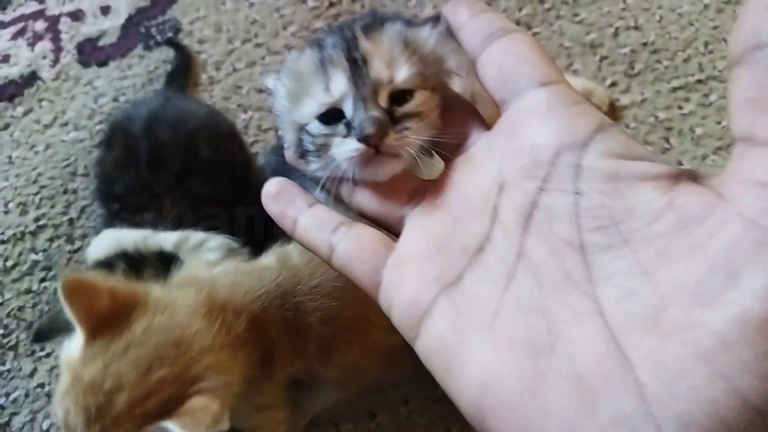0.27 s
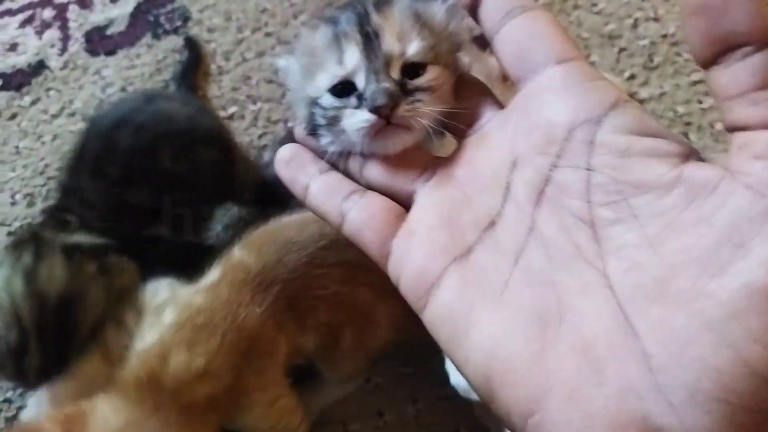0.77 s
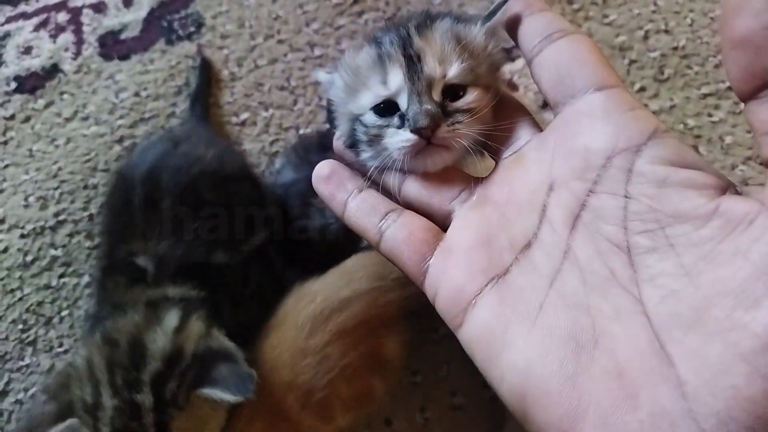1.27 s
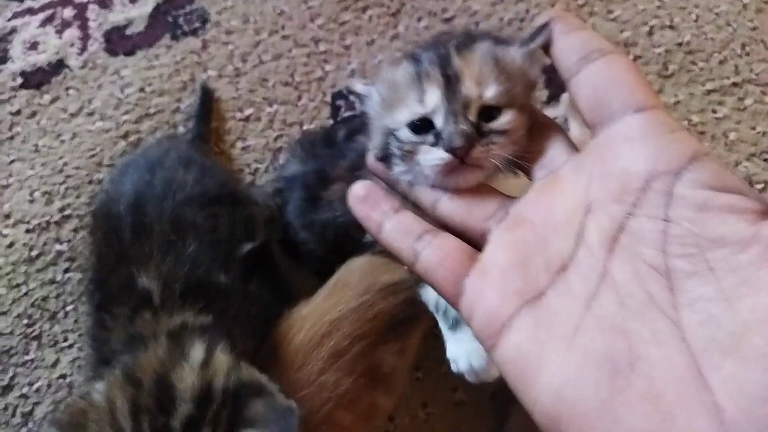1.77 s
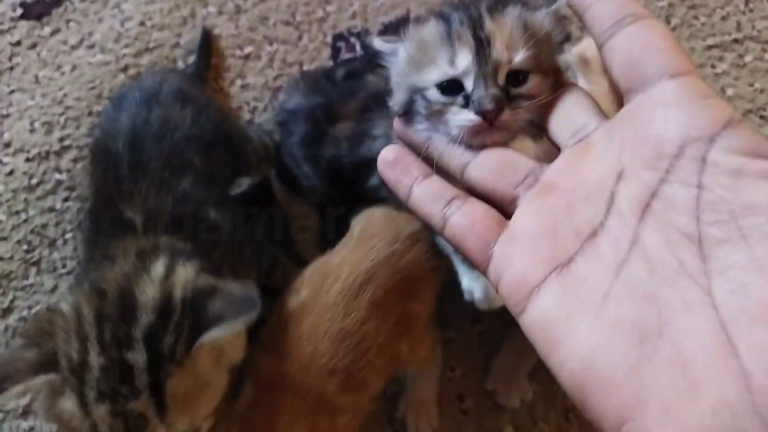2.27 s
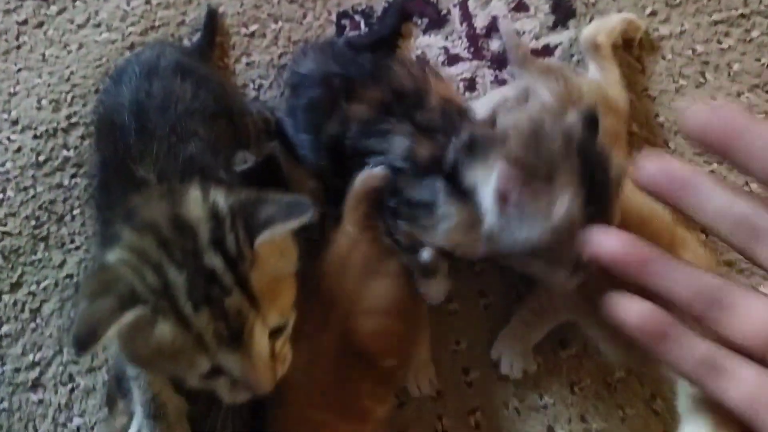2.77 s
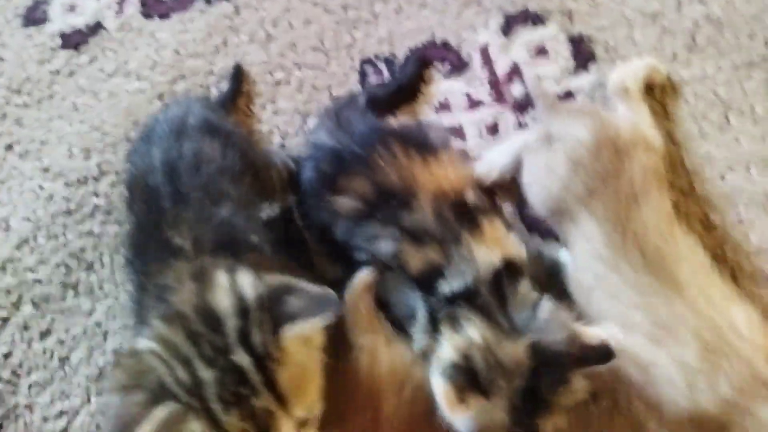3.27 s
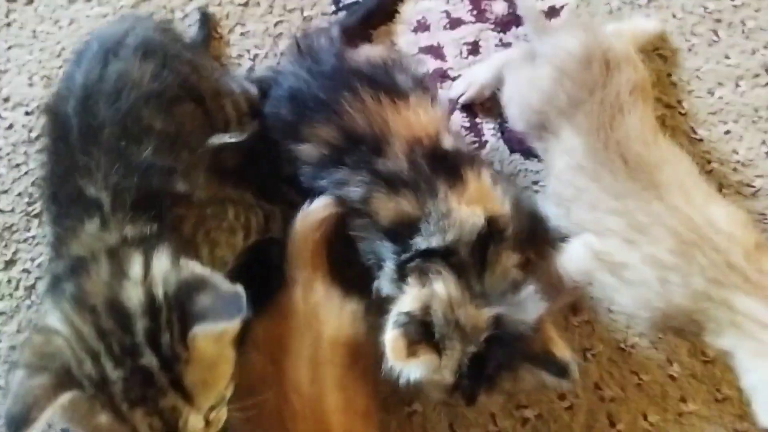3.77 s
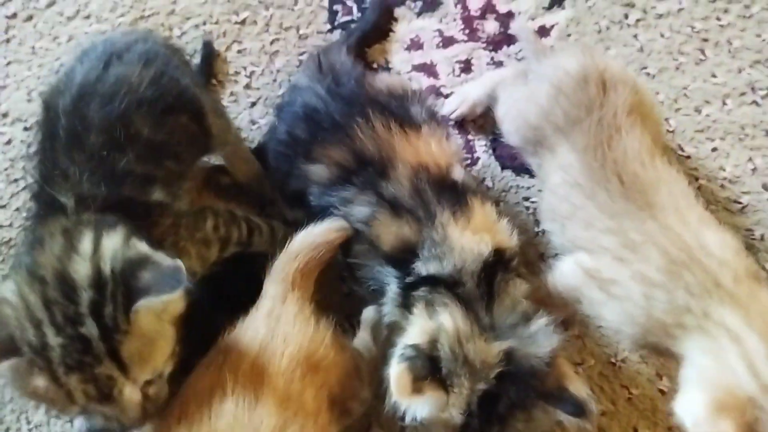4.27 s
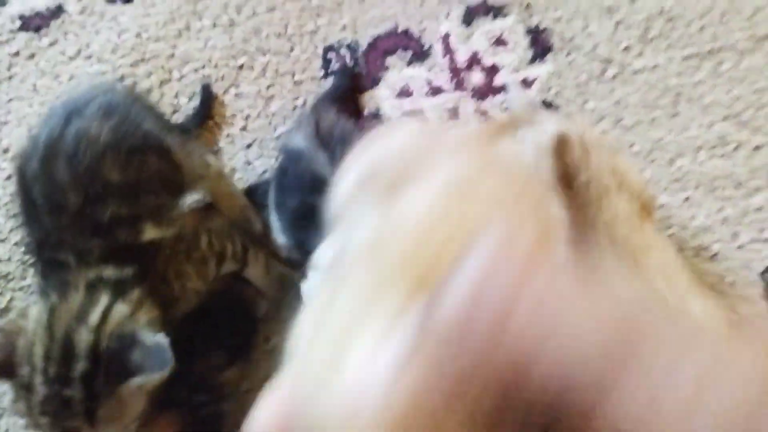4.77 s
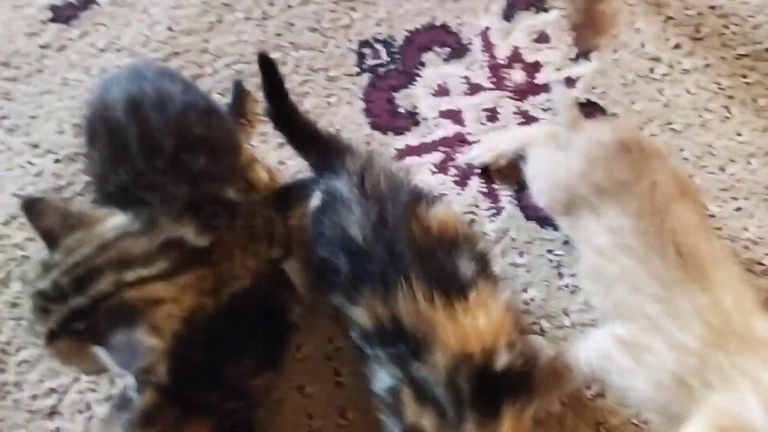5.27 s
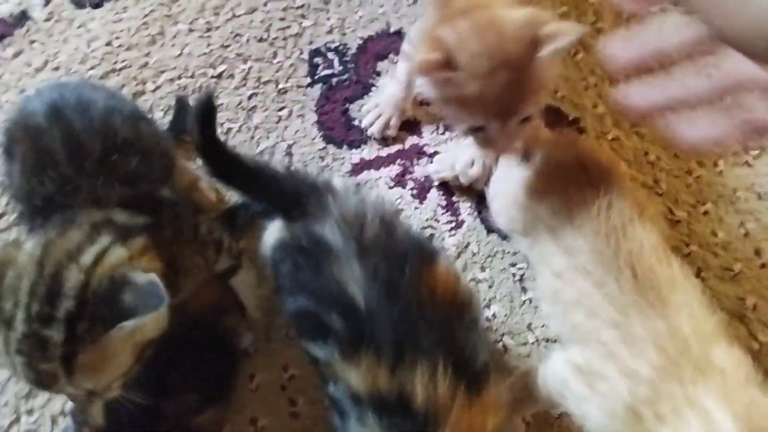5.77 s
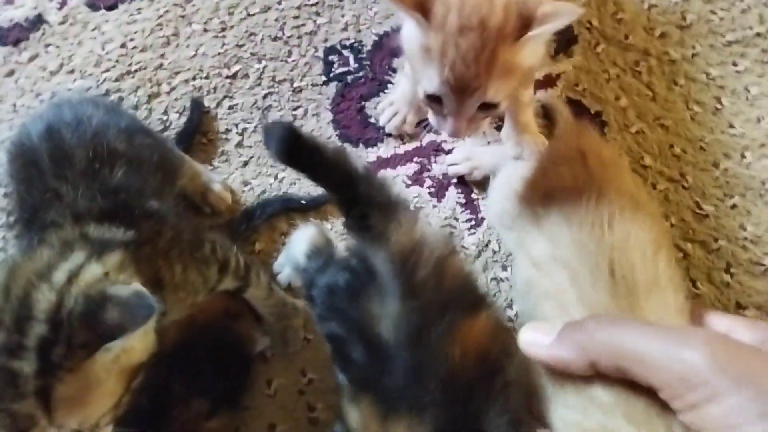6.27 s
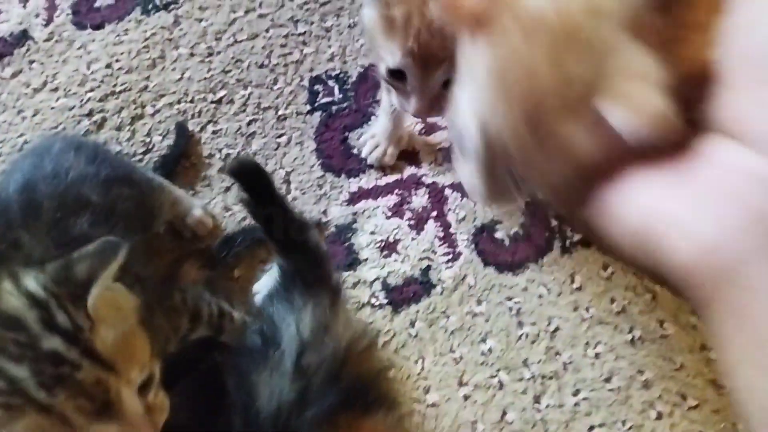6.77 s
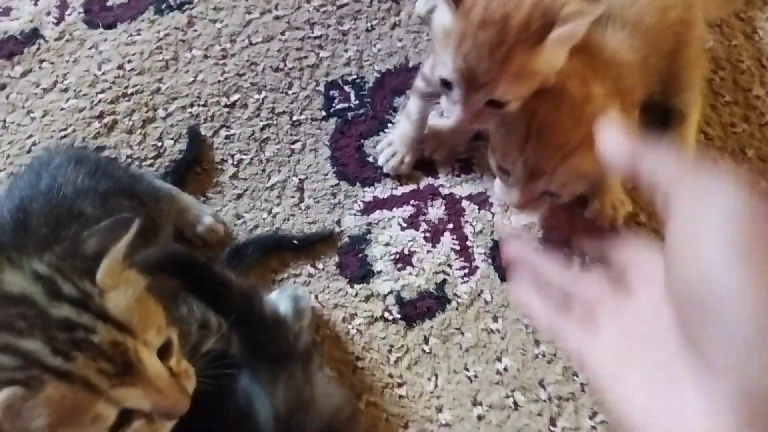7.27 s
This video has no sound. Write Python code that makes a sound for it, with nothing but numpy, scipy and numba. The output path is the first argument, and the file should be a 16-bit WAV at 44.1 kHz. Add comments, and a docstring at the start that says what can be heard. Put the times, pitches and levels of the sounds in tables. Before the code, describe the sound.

A quiet carpeted room with steady air, faint motor hum and swelling low rumble. Tiny squeaks from another kitten come first, then one close, half-second trilled mew with breath around it. Afterwards only soft fur rustles, paw thumps and sharp little knocks remain, the strongest late on. Distant birds twitter and a clock ticks faintly once a second. Close stereo microphone, short room tail.

```python
"""A kitten close by gives one trilled mew: a near-sine voice with overtones coloured by mouth and throat.
Noise of breath surrounds it, and another kitten squeaks faintly in short gliding whistles.
Paws and claws knock as damped rings and bits of treble noise; fur rustles on carpet as grainy noise.
Behind them a wall clock ticks in filtered noise, birds twitter far off in sliding tones,
and the quiet room adds steady air noise, a fan motor's hum in sine lines and a swelling low rumble."""
import sys
import numpy as np
from scipy import signal
from scipy.fft import rfft, irfft, next_fast_len
from scipy.io import wavfile
from scipy.ndimage import uniform_filter1d
from numba import njit

SR = 44100
rng = np.random.default_rng(int(sys.argv[2]) if len(sys.argv) > 2 else 0)


def natural_amplitude(level_db):
    """Convert a level in decibels to a linear amplitude factor, elementwise."""
    exponent = np.asarray(level_db, float) / 20
    return 10 ** exponent


def log_audio(samples):
    """Write samples as a 16-bit WAV file to the path given in sys.argv[1]."""
    # one column per channel
    frames = np.atleast_2d(samples).T
    # limit to full scale, then quantise
    limited = np.clip(frames, -1, 1)
    pcm = np.round(limited * 32767).astype(np.int16)
    wavfile.write(sys.argv[1], SR, pcm)


N = 331894
T = np.arange(N) / SR  # time in seconds
MIRROR = np.array([[1], [-1]])  # adds to the left, takes from the right


def on_log(table, hz):
    """Read a (Hz, value) table on a log-frequency axis."""
    table_hz, values = np.transpose(table)
    return np.interp(np.log(np.maximum(hz, 1)), np.log(np.maximum(table_hz, 1)), values)


def unit(x):
    """Scale to rms 1."""
    return x / np.sqrt(np.mean(x ** 2))


def shape(x, gain):
    """Filter by multiplying the spectrum by gain(Hz)."""
    size = next_fast_len(N)
    hz = np.arange(size // 2 + 1) * SR / size
    return irfft(rfft(x, size) * gain(hz), size)[..., :N]


def bump(hz, centre, width):
    """Gain of one resonance."""
    return 1 / np.sqrt(1 + (2 * (hz - centre) / width) ** 2)


def resonances(table, hz, power):
    """Summed gain of the resonances in a (Hz, width Hz, dB) table; a higher power makes steeper sides."""
    return sum(natural_amplitude(db) * bump(hz, centre, width) ** power for centre, width, db in table)


def pulse(middle, half_width, power=2):
    """Smooth rise and fall around a moment in seconds."""
    return np.exp(-((T - middle) / half_width) ** power)


def walk(rate):
    """Random wander of rms 1: levels held for 1 / rate seconds, then smoothed twice."""
    k = max(int(SR / rate), 1)
    steps = np.repeat(rng.standard_normal(N // k + 1), k)
    return unit(uniform_filter1d(uniform_filter1d(steps, k), k)[:N])


def pan(x, db):
    """Two channels, left louder by db."""
    return x * natural_amplitude(MIRROR * db / 2)


@njit
def svf(x, hz, width):
    """State-variable band-pass whose centre may move every sample."""
    y, b, l = np.empty(len(x)), 0., 0.
    for i in range(len(x)):
        g, k = np.tan(np.pi * hz[i] / SR), width / hz[i]
        v = (b + g * (x[i] - l)) / (1 + g * (g + k))
        b, l, y[i] = 2 * v - b, l + 2 * g * v, k * v
    return y


def band(x, hz, width):
    """Band-pass at a fixed or moving centre."""
    return svf(x, np.clip(hz + np.zeros(len(x)), 20, .45 * SR), float(width))


def double_band(x, hz, width):
    """The same band-pass twice, for steeper sides."""
    return band(band(x, hz, width), hz, width)


def echo(x, t60, wet_db, wait_s=0.0075):
    """Room tail: two decaying noises that start when the first wall answers."""
    t = np.arange(8000) / SR
    tail = rng.standard_normal((2, len(t))) * np.exp(-np.log(1000) * t / t60) * (t > wait_s)
    tail /= np.sqrt(np.sum(tail ** 2, axis=1, keepdims=True))
    return natural_amplitude(wet_db) * signal.fftconvolve(np.atleast_2d(x), tail, axes=1)[:, :N]


def overtones(phase, gains, order):
    """Partials from number `order` up, each wavering a little, together of rms near 1."""
    tones = sum(g * natural_amplitude(2 * walk(60)) * np.cos((k + order) * (phase - .8)) for k, g in enumerate(gains))
    return tones / np.sqrt(sum(g ** 2 for g in gains) / 2)


def held(start, full, fade, end, db, lost_db):
    """Level in dB that rises, holds and falls; -120 dB outside."""
    levels_db = [db - lost_db, db, db, db - lost_db]
    return np.interp(T, [start, full, fade, end], levels_db, -120, -120)


# Colour of the room air. Each row: frequency in Hz, relative level in dB.
ROOM_COLOUR = [(15, -46.5), (25, -40), (82, -1.5), (249, 0.5), (335, -7.5), (439, -8), (489, -10),
               (560, -12.5), (796, -12), (1130, -17.5), (2350, -20), (4030, -22.5), (7310, -33.5),
               (12200, -30), (16000, -33)]
# How alike the air is left and right. Each row: frequency in Hz, likeness (below 0 counts as 0).
ROOM_ALIKE = [(60, -0.23), (130, 0.86), (290, 0.59), (640, 0.2), (1410, -0.04), (3100, -0.96), (6820, -1.1),
              (15000, -1.1)]
# Hum lines of the fan motor. Each row: frequency in Hz, level in dB.
MOTOR_LINES = [(80, -78), (129.2, -77), (148, -76), (197, -78), (246, -74), (393.0, -74.5), (441.4, -76),
               (786.0, -83.5)]
# Swells of the low rumble. Each row: peak time in seconds, level in dB.
RUMBLE_SWELLS = [(.95, -63.5), (2.4, -71), (3.3, -64), (4.45, -65), (5.55, -65), (6.05, -70), (6.9, -65),
                 (7.4, -59.5)]


def room():
    """Steady air and far traffic as shaped noise, motor lines as wavering sines, a rumble as low noise."""
    mid, side = rng.standard_normal((2, N))
    alike = lambda f: np.clip(on_log(ROOM_ALIKE, f), 0, .99)
    mid = shape(mid, lambda f: natural_amplitude(on_log(ROOM_COLOUR, f)) * np.sqrt(1 + alike(f)))
    side = shape(side, lambda f: natural_amplitude(on_log(ROOM_COLOUR, f)) * np.sqrt(1 - alike(f)))
    air = natural_amplitude(-62.5) * (mid + side * MIRROR) / np.std(mid)
    # the treble of the air rises and falls slowly
    air += shape(air, lambda f: f > 5000) * (natural_amplitude(0.56 * walk(4.3)) - 1)
    hum = 0
    for hz, db in MOTOR_LINES:
        line = np.sqrt(2) * np.sin(2 * np.pi * hz * T + 1.1 * walk(4.6))
        hum = hum + natural_amplitude(db + 2 * walk(6)) * line
    rise_db_per_s, fall_db_per_s = 50, 35
    swell = sum(natural_amplitude(db - np.maximum(rise_db_per_s * (s - T), fall_db_per_s * (T - s)))
                for s, db in RUMBLE_SWELLS)
    rumble = unit(double_band(rng.standard_normal(N), 84, 70)) * swell
    return pan(air, 0.95) + hum + rumble


# Far bird phrases. Each row: middle in seconds, length in seconds, level in dB, pitch in Hz at the middle.
BIRD_PHRASES = [(.1, .14, -72, 4200), (.28, .2, -71, 3700), (.54, .22, -69, 3600), (.95, .4, -70, 3300),
                (1.3, .2, -65.5, 3900), (1.58, .16, -72, 3900), (1.74, .15, -73, 3380),
                (2.8, .22, -66.5, 4000), (3.03, .2, -71, 3300), (3.34, .14, -66, 3700),
                (3.53, .25, -66, 3550), (3.8, .15, -74, 3900), (4.1, .12, -71, 3500),
                (4.48, .26, -66.5, 3550), (4.7, .14, -74, 3300), (4.95, .2, -67, 4000),
                (5.2, .3, -69, 4000), (5.48, .2, -69, 4000), (5.77, .16, -67, 4200), (6.3, .45, -67, 3750),
                (6.68, .2, -71, 3700), (7.04, .25, -65.5, 3800), (7.3, .3, -67, 4000)]
# Single far peeps. Each row: middle in seconds, length in seconds, pitch in Hz, level in dB.
BIRD_PEEPS = [(.17, .06, 1850, -76), (.245, .05, 1950, -75), (.835, 0.058, 2700, -75),
              (1.006, .09, 2830, -74), (1.049, 0.013, 4240, -68), (1.45, 0.11, 2294, -78),
              (1.632, 0.032, 1216, -70), (4.797, 0.095, 2760, -74), (4.96, .06, 2738, -75),
              (6.745, 0.02, 1830, -69), (6.745, 0.0083, 4300, -66.5)]


def birds():
    """Falling twitters round a sliding centre and lone peeps, blurred by distance and walls."""
    s, length, db, hz = np.transpose(BIRD_PHRASES)[:, :, None]
    phrases = natural_amplitude(db) * pulse(s, length / 2)
    loud, now = phrases.sum(axis=0), np.argmax(phrases, axis=0)  # now: the loudest phrase at each moment
    slide_s = np.clip(T - s[now, 0], -length[now, 0], length[now, 0])
    fall_hz_per_s = 2200
    centre = uniform_filter1d(hz[now, 0] - fall_hz_per_s * slide_s, size=400)
    chirps = 0
    for offset in (-.19, -.12, -.05, 0.034, 0.12, 0.18):  # six voices, pitched around the centre
        cycle = np.cumsum(11 * (1 + .4 * walk(3))) / SR % 1  # about 11 chirps a second
        pitch = centre * (1 + offset + .03 * walk(20) + .16 * (.5 - cycle))
        tone = np.sin(2 * np.pi * np.cumsum(pitch) / SR)
        chirps = chirps + tone * np.sin(np.pi * cycle) ** 2 * natural_amplitude(3.5 * walk(8))
    blur = unit(np.array([double_band(rng.standard_normal(N), centre, 1500) for _ in range(2)]))
    peeps = 0
    for s, length, hz, db in BIRD_PEEPS:
        tone = np.sin(2 * np.pi * hz * T + 2.2 * walk(40))
        peeps = peeps + natural_amplitude(db) * tone * pulse(s, length / 2, 4)
    return echo(unit(chirps) * loud, .14, -2.5) + natural_amplitude(-3) * blur * loud + peeps + echo(peeps, 0.05, 1)


# Resonances of the clock case. Each row: frequency in Hz, width in Hz, relative level in dB.
CLOCK_CASE = [(527, 72, 11), (1300, 1500, -2.5), (2170, 810, -5.5), (5900, 1200, -8), (12000, 5000, -13)]
# Ticks, one row a second. Each row: rattle level in dB, knock level in dB.
CLOCK_TICKS = [(-74, -70), (-76, -60), (-69, -51), (-74.5, -74), (-74.5, -62), (-73, -56), (-78, -76),
               (-73.5, -58)]


def clock():
    """Once a second the gears step: a knock, then a rattle of about 70 ms in the case, far off."""
    first_s = .06
    since = (T - first_s) % 1
    rattle_db, knock_db = np.array(CLOCK_TICKS)[np.maximum(T - first_s, 0).astype(int)].T
    steps = np.minimum(since / 0.0032, 1) * np.exp(-since / 0.037)
    steps += .5 * np.exp(-((since - .05) / .035) ** 2)
    rattle = rng.standard_normal((2, N)) * natural_amplitude(2.8 * walk(120)) * steps
    case = shape(rattle, lambda f: resonances(CLOCK_CASE, f, 1))
    knock = np.sin(2 * np.pi * 560 * since) * since / 0.008 * np.exp(1 - since / 0.0059)
    return natural_amplitude(rattle_db) * unit(case) + natural_amplitude(knock_db) * knock


# Rustles of fur on carpet.
# Each row: middle in seconds, length in seconds, level in dB, tilt in dB per octave (900 to 9000 Hz).
FUR_RUSTLES = [(3.2, 1.1, -79, 6), (6.92, .35, -76, 6), (3.29, .05, -69, 5), (3.385, .04, -66.5, 10.5),
               (3.756, 0.087, -68.5, -2), (4.517, 0.045, -57.5, -12), (5.986, 0.052, -65.5, -2.5),
               (6.257, 0.1, -68.5, -3.5), (6.515, 0.12, -61.5, -3), (6.654, .022, -60, -6)]


def rustles():
    """Brief swells of grainy noise from fur on carpet; a very dull one is more alike left and right."""
    out = 0
    for s, length, db, tilt_db in FUR_RUSTLES:
        swell = pulse(s, length / 2, 4)
        mid, side = rng.standard_normal((2, N)) * natural_amplitude(3 * walk(330))
        grain = mid + np.clip(2 + tilt_db / 8, .2, 1) * side * MIRROR
        tilt = lambda f: natural_amplitude(tilt_db * np.log2(np.clip(f, 900, 9000) / 2000)) * (f > 200)
        grain = shape(grain, tilt) * swell
        out = out + grain * natural_amplitude(db) * np.sqrt(np.mean(swell ** 2) / np.mean(grain ** 2))
    return out


# Knocks of claws and hands. Each row: start in seconds, ring level in dB, ring pitch in Hz,
# cycles over which the ring decays (at least 0.3), treble crack level in dB, left minus right in dB.
KNOCKS = [(.8422, -43.5, 630, .67, -71.5, -11.5), (1.7192, -54, 1260, 1.5, -64, -5),
          (2.8262, -44, 1700, 4.5, -64, -8), (3.6032, -48, 4100, .9, -51, 4.5),
          (4.8872, -46.5, 1400, 1.3, -52, 6), (4.9432, -39.5, 2680, 1.1, -62, -.5),
          (6.4775, -47, 2000, .8, -60, 4.5), (6.483, -42, 3300, 1.3, -58, 12),
          (6.4945, -46, 2200, .8, -57, 9), (6.514, -45, 2150, .9, -57, 5), (6.5338, -32, 2880, .94, -53, 8),
          (6.5405, -44, 1500, .8, -51, 4.5), (6.6314, -27, 800, .7, -43, 9.5),
          (6.6324, -37, 330, 1, -52, 9.5)]
# Dry snaps, crack only. Each row: start in seconds, level in dB, left minus right in dB.
DRY_SNAPS = [(1.7402, -39, -5), (1.9532, -51.5, -4), (6.4685, -56, 5), (6.523, -58, 6), (6.585, -55, 10)]
# Soft thumps of paws. Each row: start in seconds, level in dB, pitch in Hz.
PAW_THUMPS = [(0.31, -69, 201), (1.887, -58, 102), (3.189, -55, 130), (3.525, -69, 274),
              (3.992, -54.5, 269), (6.79, -58.5, 129), (7.056, -62.5, 121), (7.171, -55, 103)]


def clicks():
    """Each knock is a short damped ring and a crack of treble, a snap the crack alone; thumps ring low and soft."""
    out, t = np.zeros((2, N + 4096)), np.arange(4096) / SR
    crack = lambda: double_band(rng.standard_normal(len(t)), 10000, 14000) * np.exp(-t / 0.0011)

    def add(s, sound):
        start = int(s * SR)
        out[:, start:start + len(t)] += sound

    for s, ring_db, hz, cycles, crack_db, pan_db in KNOCKS:
        ring = -np.sin(2 * np.pi * hz * t) * np.exp(-t * hz / max(cycles, .3))
        ring += .5 * np.sin(2 * np.pi * min(3.0 * hz, 2800) * t) * np.exp(-t / 0.00053)
        add(s, pan(natural_amplitude(ring_db) * ring + natural_amplitude(crack_db) * crack(), pan_db))
    for s, db, pan_db in DRY_SNAPS:
        add(s, pan(natural_amplitude(db) * crack(), pan_db))
    tail = echo(out[0, :N], 0.11, -11.5, wait_s=0.012)  # the thumps get no tail
    for s, db, hz in PAW_THUMPS:
        add(s, natural_amplitude(db) * np.sin(2 * np.pi * hz * t) * t / 0.0068 * np.exp(1 - t / 0.01))
    return out[:, :N] + tail


# Faint squeak notes. Each row: start in seconds, length in seconds, start pitch in Hz, end pitch in Hz,
# level in dB, second partial in dB relative to the first.
SQUEAK_NOTES = [(.084, .036, 1400, 900, -55, -24), (.116, .02, 1050, 1250, -57, -25),
                (.901, .018, 1480, 1380, -56, -9), (.914, .05, 1280, 1030, -58, -5.5)]


def squeaks():
    """Another kitten's short gliding whistles with a second partial: quick start, fading to the end."""
    out = 0
    for s, length, hz, end_hz, db, second_db in SQUEAK_NOTES:
        done = np.clip((T - s) / length, 0, 1)
        glide_hz = (hz + (end_hz - hz) * done) * (1 + .025 * walk(300))
        phase = 2 * np.pi * np.cumsum(glide_hz) / SR
        size = natural_amplitude(db + 2 * walk(250)) * np.clip(np.minimum(done / .3, (1 - done) / .5), 0, 1)
        out = out + np.sqrt(2) * size * (np.sin(phase) + natural_amplitude(second_db) * np.sin(2 * phase))
    return pan(out, 0.5) + echo(out, .17, -8.5)


# Resonances of the nose. Each row: frequency in Hz, width in Hz, relative level in dB.
NOSE = [(9150, 230, 6.5), (10500, 500, -5), (11800, 380, 7.5), (13100, 500, -1), (14700, 1100, 2.5)]
# Resonances of the mouth for breath. Each row: frequency in Hz, width in Hz, relative level in dB.
MOUTH = [(1780, 780, 3.5), (2300, 450, 0.5), (3480, 480, 0.5), (5200, 1800, -27)]
# Air around the mew, through nose and mouth. Each holds: start, full, fade and end in seconds,
# level in dB when full, dB lost at start and end.
NOSE_AIR = (1.86, 2.1, 2.42, 2.72, -61.5, 17)
MOUTH_AIR = (1.88, 2.16, 2.36, 2.72, -50.5, 27)
# Last lone closures of the vocal folds as the voice dies. Each row: start in seconds, level in dB.
CREAKS = [(2.5015, -37), (2.513, -31.5)]


def breath():
    """Thin hiss through the nose and a darker one through the mouth, puffed once a voice cycle, strongest in the trill."""
    # the last factor weakens everything below 8600 Hz
    nose_colour = lambda f: resonances(NOSE, f, 1.5) * bump(np.minimum(f, 8600), 12000, 900) ** 2
    nose = shape(rng.standard_normal((2, N)), nose_colour)
    when, hz, effort_db = np.transpose(MEW)[:3]
    voiced = np.clip((np.interp(T, when, effort_db, -90, -90) + 44) / 15, 0, .9)
    puffs = 1 + voiced * np.cos(2 * np.pi * np.cumsum(np.interp(T, when, hz)) / SR)
    trill_db = sum(14 * rough * pulse(s, spread) * (1 + .5 * walk(180)) for s, spread, rough in TRILL)
    sigh_db = 8 * pulse(2.535, .05)  # a last puff as the voice stops
    mouth = unit(shape(rng.standard_normal(N) * puffs, lambda f: resonances(MOUTH, f, 2)))
    mouth *= natural_amplitude(held(*MOUTH_AIR) + sigh_db + trill_db + 2.5 * walk(60))
    for s, db in CREAKS:
        since = np.maximum(T - s, 0)
        ring = sum(natural_amplitude(gain_db) * np.sin(2 * np.pi * centre * since) * np.exp(-np.pi * width * since)
                   for centre, width, gain_db in MOUTH[:3])
        mouth += natural_amplitude(db) * ring * np.minimum(since / .0008, 3)
    return unit(nose) * natural_amplitude(held(*NOSE_AIR) + .8 * walk(40)) + pan(mouth, -5.5) + echo(mouth, 0.13, -6)


# Course of the mew. Each row: time in seconds, pitch in Hz, effort in dB,
# second partial in dB above the effort, overtones in dB above the effort.
MEW = [(2.05, 665, -47.5, -17, -9), (2.062, 628, -34, -18, -10), (2.098, 588, -30, -28, -7),
       (2.112, 535, -26, -26, -9), (2.134, 450, -19.5, -22, -22), (2.15, 466, -21, -23, -24),
       (2.17, 526, -21, -20, -10), (2.186, 555, -22.5, -22, -10), (2.204, 548, -23, -22, -15),
       (2.226, 534, -20.5, -21, -11), (2.27, 521, -21, -24, -13), (2.29, 486, -19, -17, -22),
       (2.305, 476, -18, -21, -26), (2.325, 510, -20, -27, -16), (2.345, 512, -21.5, -33, -17),
       (2.374, 496, -19.5, -26, -19), (2.412, 478, -19, -20, -19.5), (2.44, 450, -19, -22, -26),
       (2.46, 437, -20, -23, -30), (2.486, 425, -27.5, -25, -30), (2.504, 430, -41, -28, -18),
       (2.59, 425, -60, -30, -15)]
# Moments where the trill breaks the voice. Each row: middle in seconds, half-width in seconds, roughness 0-1.
TRILL = [(2.148, 0.016, 0.36), (2.303, 0.019, 0.24)]
# Fixed throat resonances. Each row: frequency in Hz, width in Hz, relative level in dB.
THROAT = [(3400, 500, 0), (4800, 900, -23)]
# Stereo colour of the near voice. Each row: frequency in Hz, left minus right in dB.
NEAR_BALANCE = [(60, 7), (110, 16.5), (200, -1), (380, -0.5), (700, 4), (1290, -11), (2380, -2), (4400, -5),
                (8120, -24.5), (15000, -5.5)]


def mew():
    """A near-sine fundamental with overtones coloured by mouth and throat; the trill shakes pitch and size."""
    s, *columns = np.transpose(MEW)
    hz, effort_db, second_db, over_db = (uniform_filter1d(np.interp(T, s, c), size=260) for c in columns)
    rough = 0.051 + sum(r * pulse(middle, spread) for middle, spread, r in TRILL)
    phase = 2 * np.pi * np.cumsum(hz * (1 + 0.077 * rough * walk(400))) / SR
    # the soft palate flaps about 90 times a second and chokes the voice at each beat
    choke_db = sum(-10 * r * pulse(middle, spread) * np.cos(np.pi * 90 * (T - middle - .005)) ** 2
                   for middle, spread, r in TRILL)

    # the mouth opens after the last trill: its upper resonance steps up and the throat gets louder
    opened = np.clip((T - 2.335) / .02 + .5, 0, 1)
    low_hz, high_hz = 1620, 2150 + 280 * opened
    mouth_gains = [bump(k * hz, low_hz, 390) ** 2 + 1.1 * bump(k * hz, high_hz, 480) ** 2
                   for k in range(3, 7)]
    mouth = overtones(phase, mouth_gains, order=3)
    throat = overtones(phase, [resonances(THROAT, k * hz, 3) for k in range(5, 12)], order=5)
    throat_db = -20 + 10 * opened  # relative to the mouth overtones

    closed = np.clip((effort_db + 42.5) / 12, 0, 1)  # weak effort leaves the folds open: no overtones
    first = natural_amplitude(choke_db + 3 * (1 - closed) * walk(200)) * np.sin(phase)
    second = closed * natural_amplitude(second_db) * np.cos(2 * phase)
    voice = np.sqrt(2) * (first + second)
    voice += closed * natural_amplitude(over_db + 8 * rough * walk(250)) * (mouth + natural_amplitude(throat_db) * throat)
    voice *= natural_amplitude(effort_db) * np.clip((T - 2.052) / .004, 0, 1) * np.clip((s[-1] - T) / .045, 0, 1)

    balance = lambda f, side: natural_amplitude(side * on_log(NEAR_BALANCE, f) / 2) * np.minimum(f / 330, 1) ** 3
    near = np.array([shape(voice, lambda f: balance(f, side)) for side in (1, -1)])
    tail = echo(shape(voice, lambda f: np.minimum(f / 1500, 1) ** 2), .25, -13)
    return near + tail


def scene():
    """All sources at the two microphones."""
    return room() + birds() + clock() + rustles() + clicks() + squeaks() + breath() + mew()


def low_pass(x):
    """Removes everything above the highest recorded frequency."""
    return signal.sosfilt(signal.butter(12, 15800, fs=SR, output="sos"), x)


def record(dry):
    """Turns the finished mix into the sound that is written out."""
    return low_pass(dry)


dry = scene()
out = record(dry)
log_audio(out)
```